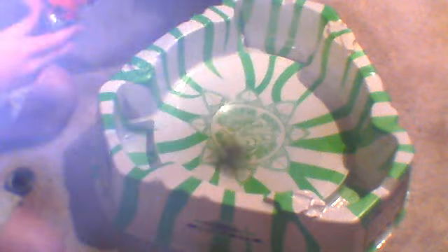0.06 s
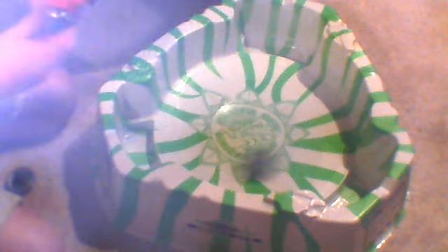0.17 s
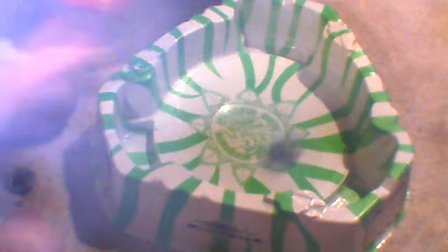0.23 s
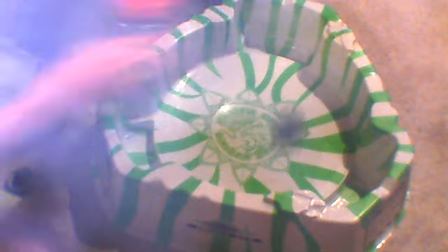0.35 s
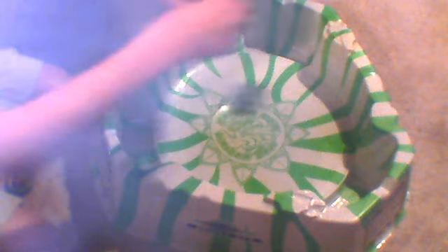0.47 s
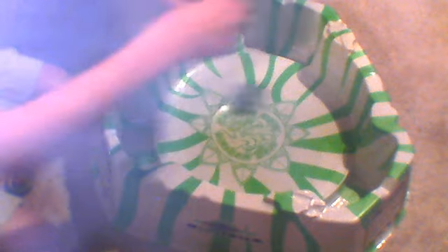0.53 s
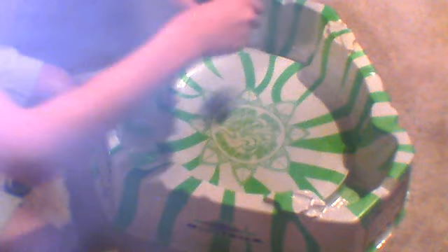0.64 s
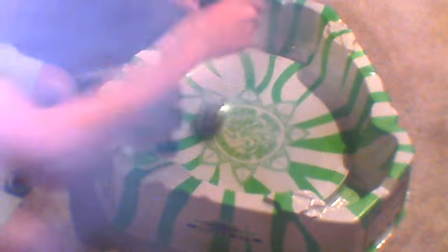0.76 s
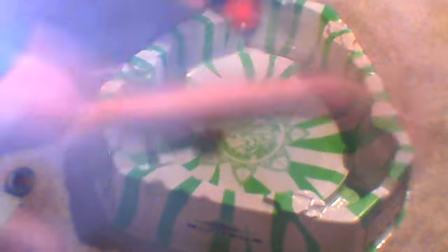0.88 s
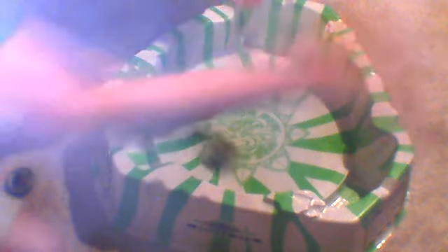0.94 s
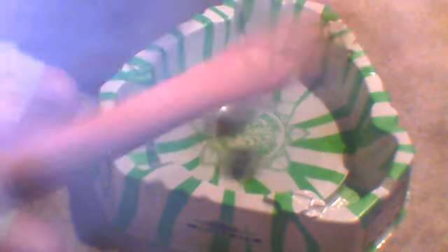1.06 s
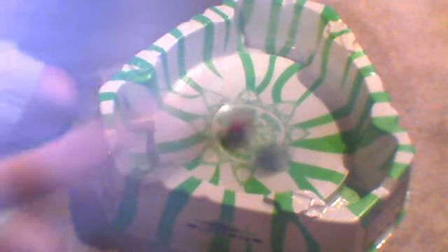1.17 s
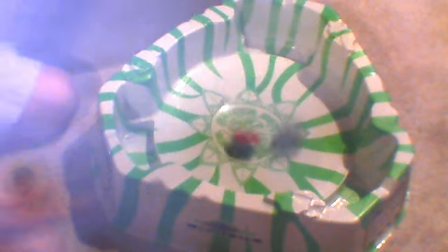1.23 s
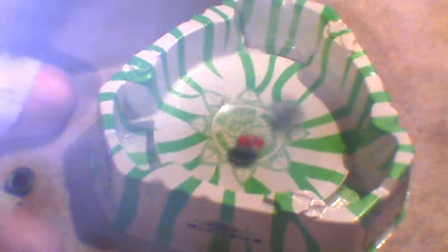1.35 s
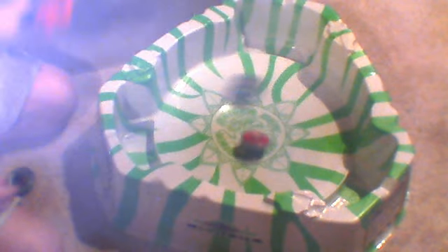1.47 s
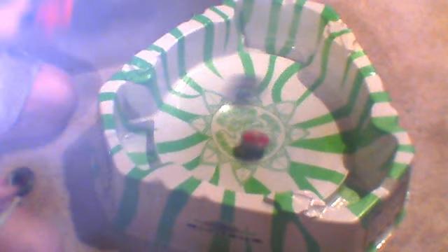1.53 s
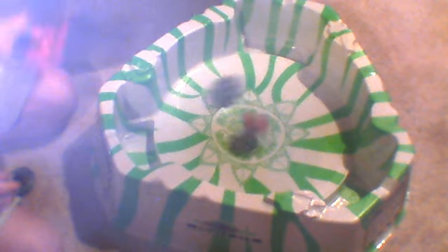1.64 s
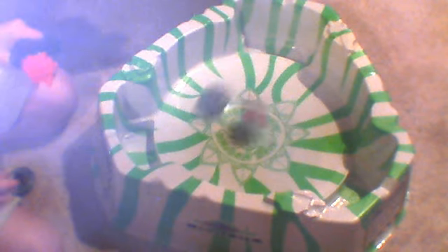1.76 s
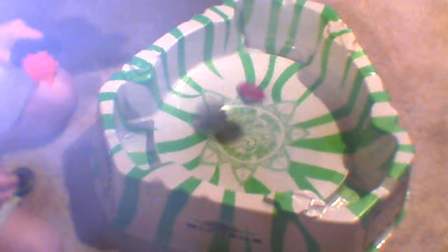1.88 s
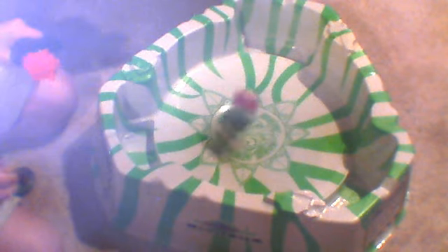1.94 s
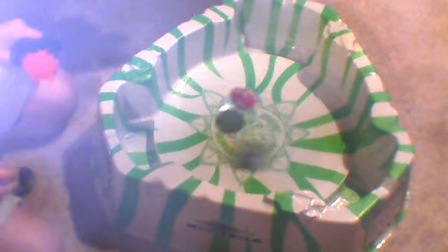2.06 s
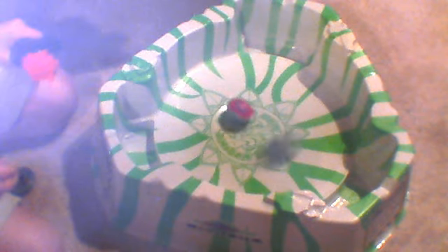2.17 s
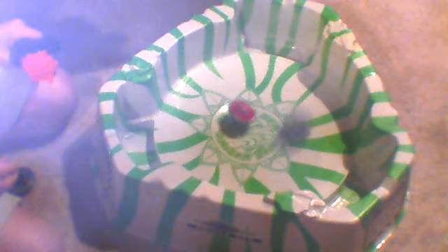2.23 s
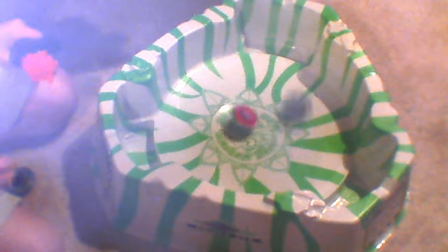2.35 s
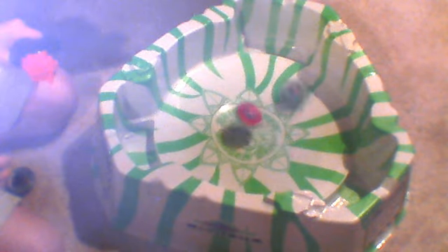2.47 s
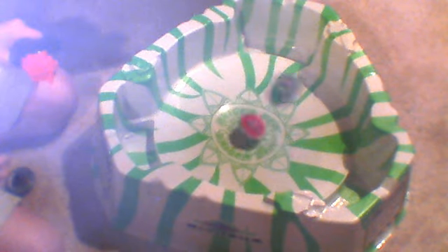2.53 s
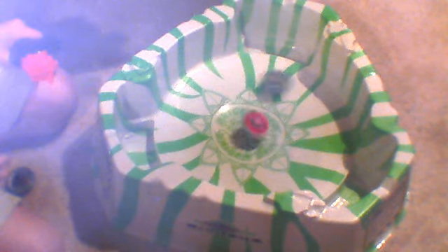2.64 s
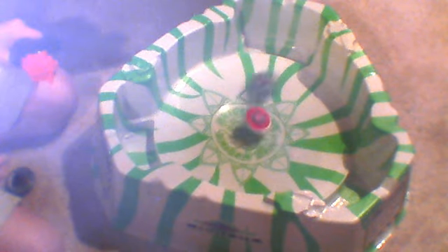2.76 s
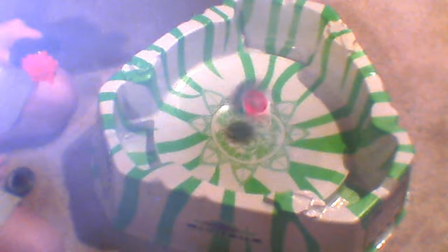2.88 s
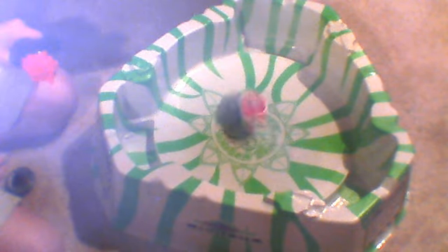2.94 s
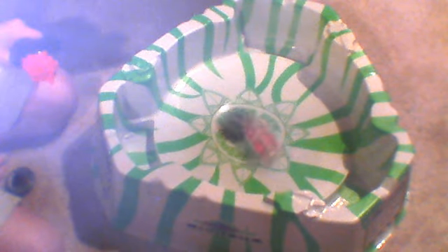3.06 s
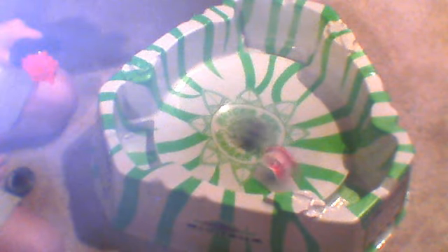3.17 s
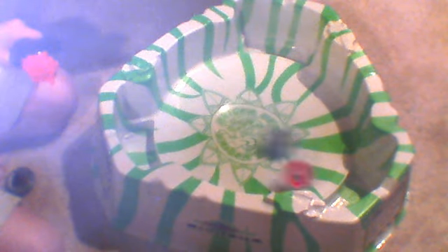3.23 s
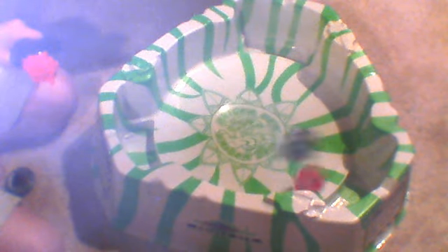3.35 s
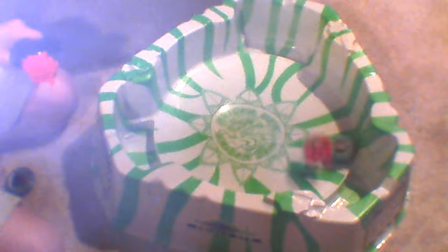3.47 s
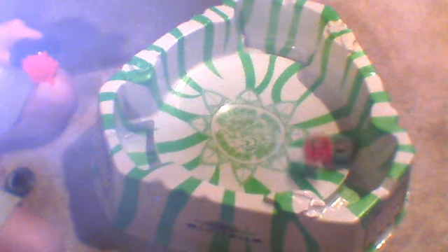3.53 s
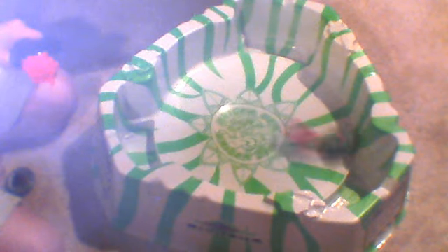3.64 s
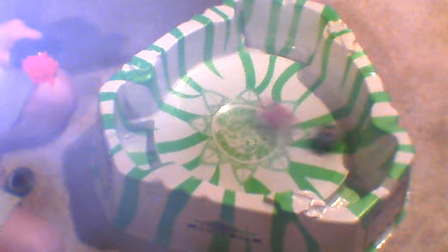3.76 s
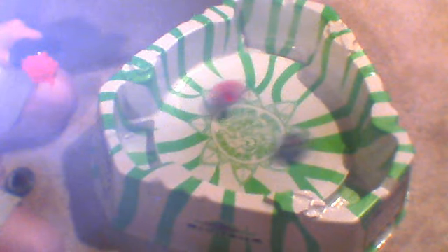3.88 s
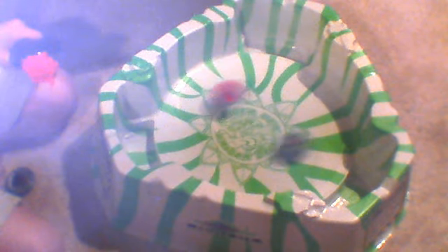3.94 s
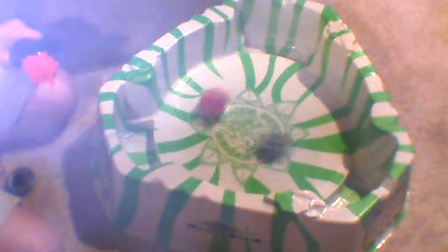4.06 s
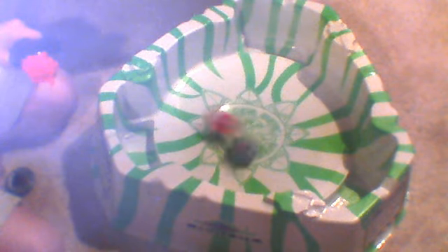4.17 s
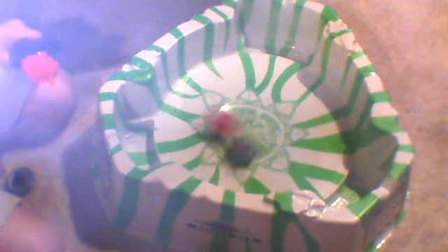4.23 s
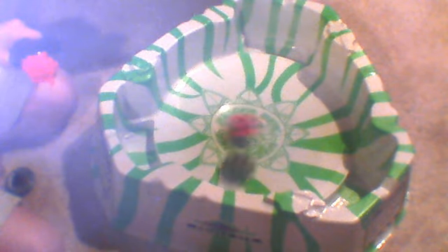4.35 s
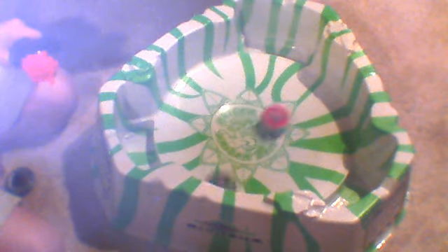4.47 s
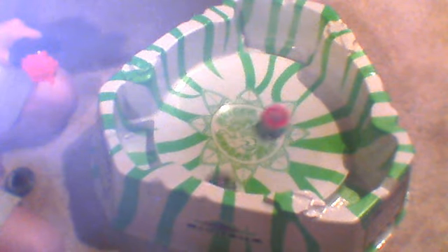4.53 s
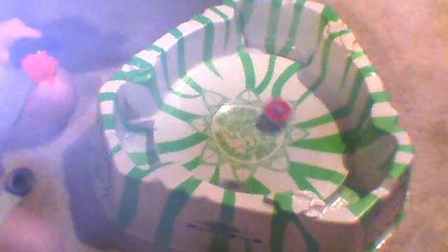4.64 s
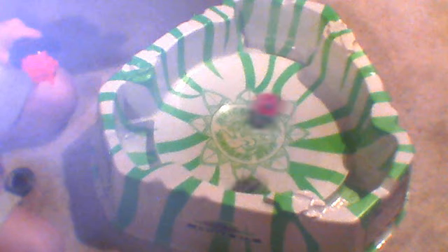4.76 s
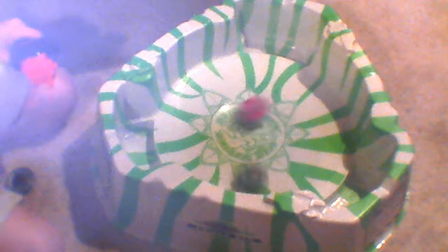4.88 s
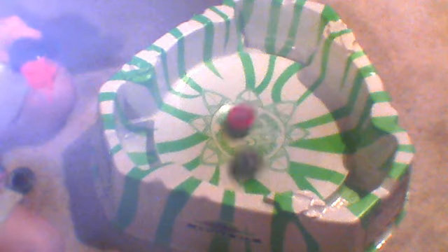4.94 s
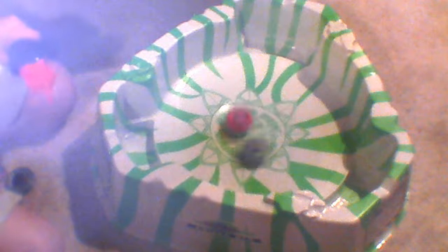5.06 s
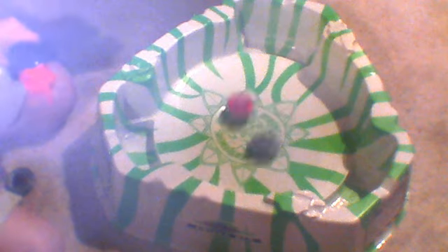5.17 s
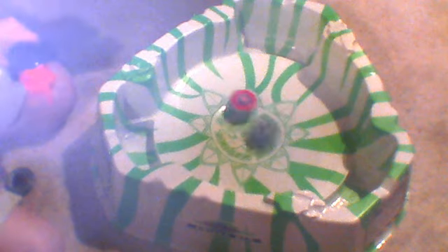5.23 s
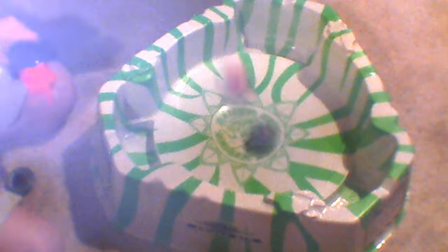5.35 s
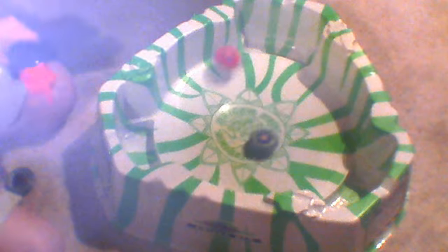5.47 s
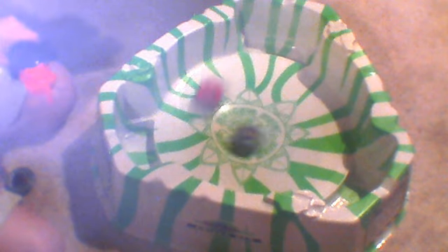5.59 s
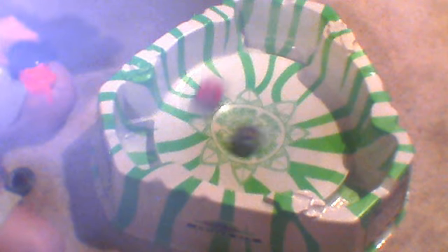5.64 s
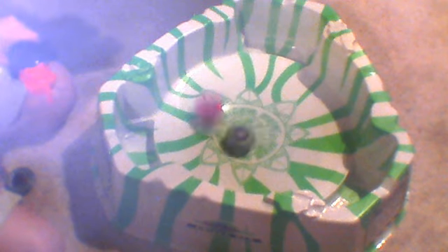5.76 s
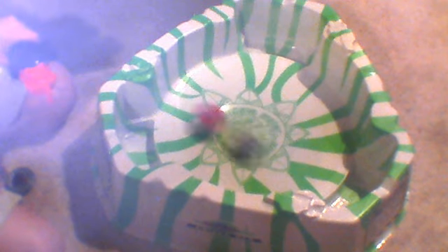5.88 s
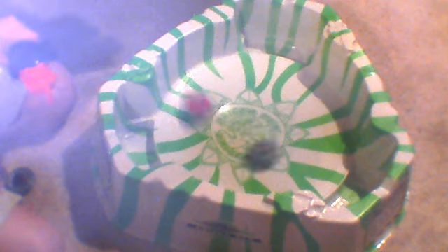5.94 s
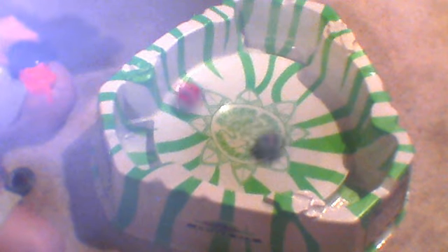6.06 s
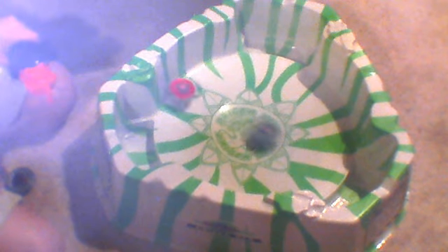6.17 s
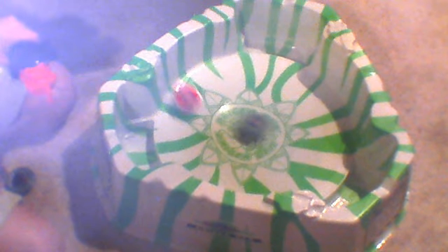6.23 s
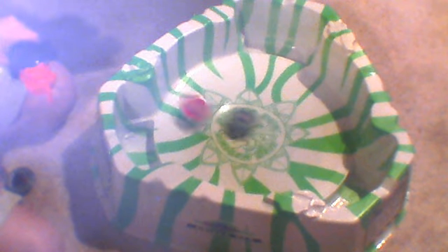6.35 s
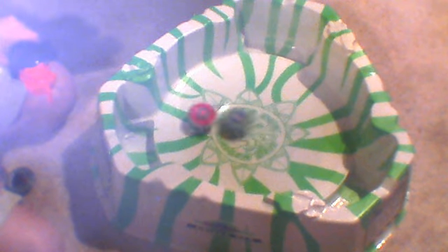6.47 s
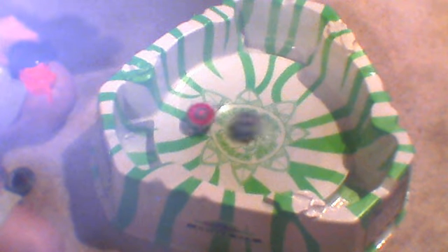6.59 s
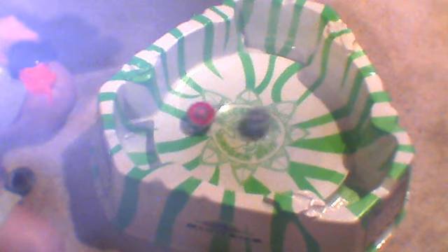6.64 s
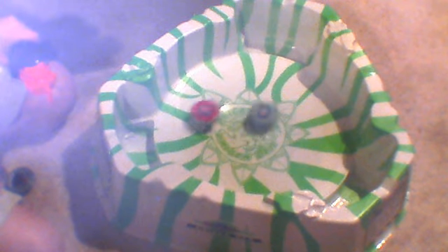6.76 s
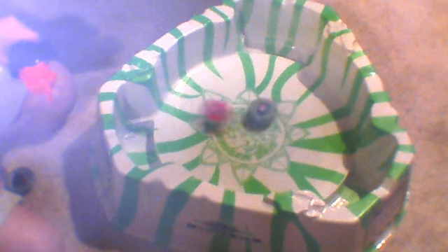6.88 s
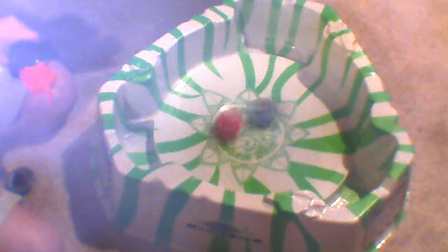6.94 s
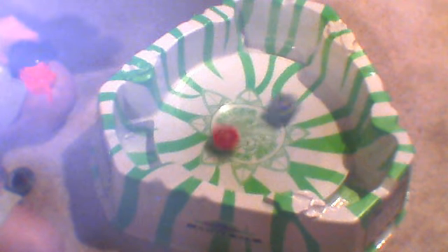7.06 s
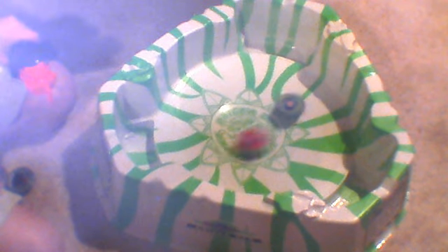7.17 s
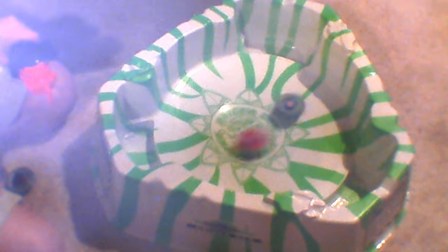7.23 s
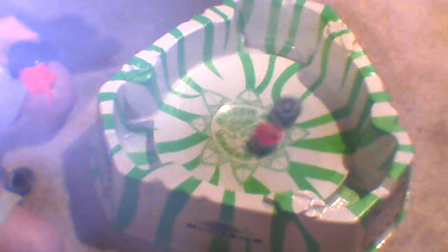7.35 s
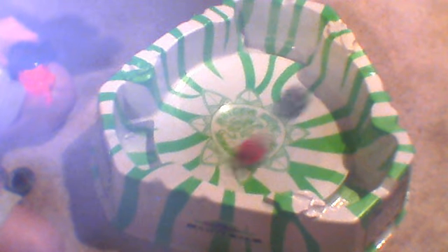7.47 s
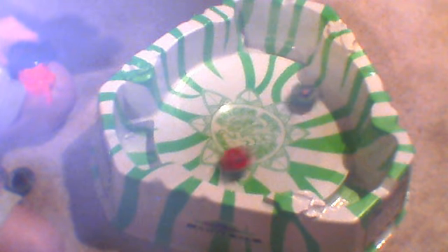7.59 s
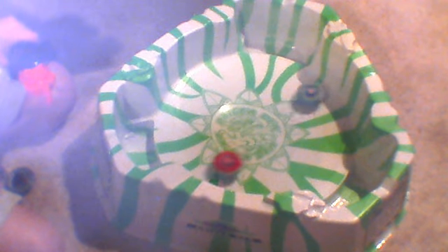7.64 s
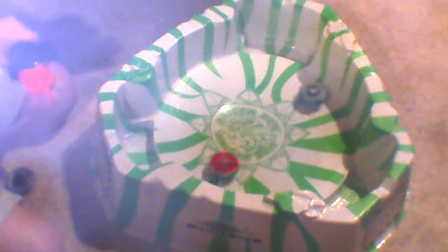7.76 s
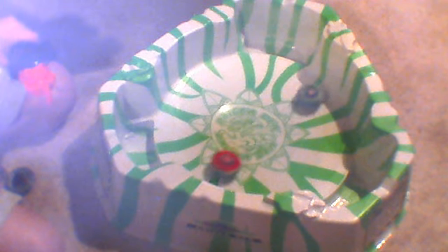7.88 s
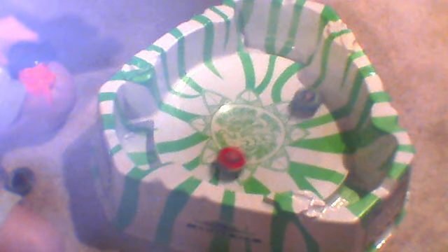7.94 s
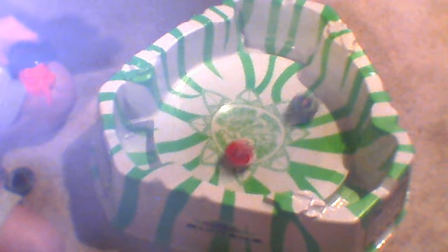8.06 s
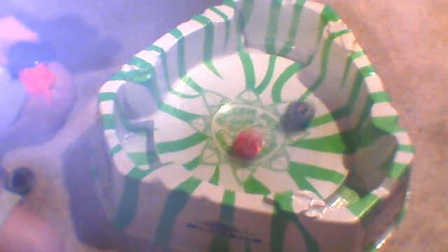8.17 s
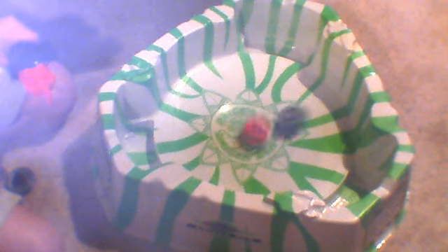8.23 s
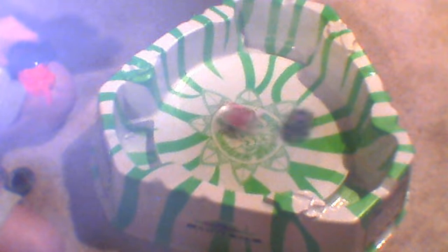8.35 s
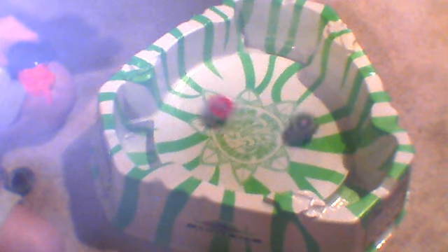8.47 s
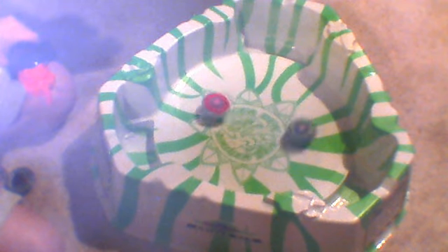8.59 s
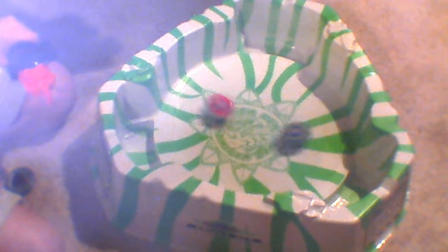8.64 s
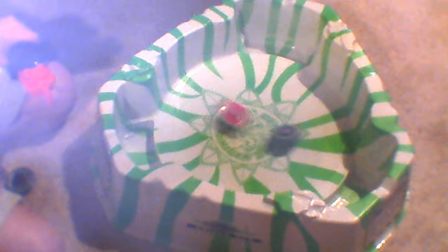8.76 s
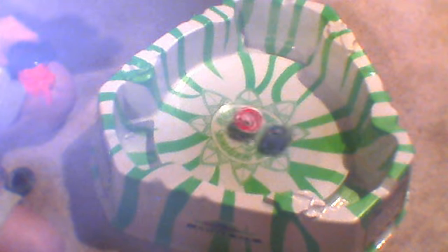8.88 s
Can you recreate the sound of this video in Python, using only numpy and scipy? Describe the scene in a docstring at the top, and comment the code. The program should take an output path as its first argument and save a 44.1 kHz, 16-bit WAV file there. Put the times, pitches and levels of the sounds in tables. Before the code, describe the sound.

A ratcheting cord rip ends in a loud crack, then metal spinning tops hop, rumble and clash in a thin plastic bowl.

```python
"""Metal spinning tops, ripped from a toothed cord into a thin plastic bowl on the floor of a small room. They
land with a crack; their tips hop and rumble over the bowl, whose decaying modes boom like a drum under knocks
and ticks. Their metal wheels clash in bright noise cracks and ring in close modes; leaning tops tap the wall.
Noise gives a steady hush, sparse echoes the room; a small mono microphone clips the loudest blows."""
import sys
import numpy as np
from scipy import signal
from scipy.fft import rfft, irfft, next_fast_len
from scipy.io import wavfile
from scipy.ndimage import uniform_filter1d

SR = 44100
rng = np.random.default_rng(int(sys.argv[2]) if len(sys.argv) > 2 else 0)


def to_wav(s):
    """Save 16-bit WAV."""
    ch = np.atleast_2d(s).T  # columns
    pcm = np.round(np.clip(ch, -1, 1) * 32767)  # PCM
    wavfile.write(sys.argv[1], SR, pcm.astype(np.int16))


def amplitude_ratio(level_db):
    """Convert a level in decibels to the matching linear amplitude (field) ratio."""
    exponent = np.asarray(level_db, float) / 20
    return 10 ** exponent


N = 392931

# modes of the bowl, its floor below 470 Hz and its walls above: f/Hz, relative level/dB, t60/s
BOWL_MODES = [(133.5, -15.5, 0.41), (199, 2.5, 0.1), (242.1, -2, 0.14), (303.4, 0, 0.11), (337, 1.5, 0.063),
              (380, -7, 0.17), (424, -6.5, 0.16), (510, -2.5, 0.055), (580, -2, 0.031), (655, -12, 0.063),
              (778, -4.5, 0.061), (854, -5.5, 0.039), (990.6, 2.5, 0.025), (1189, 8.5, 0.017),
              (1400, -1, 0.041), (1703, -1.5, 0.029), (2880, 1, 0.017), (4294, 5, 0.018)]
# spectrum of a tip ticking on plastic: f/Hz, relative density/(dB per Hz)
TICK_SPECTRUM = [(410, -24.5), (700, -14.5), (2080, -14.5), (3070, -10.5), (4220, -10.5), (5690, -15.5),
                 (10800, -47), (14000, -93)]
# spectrum of the cord and launcher: f/Hz, relative density/(dB per Hz)
CORD_SPECTRUM = [(600, -35), (950, -20.5), (1300, -3), (1800, -16), (2300, -15.5), (4500, -7), (11000, -34)]


def evened(x):
    """Normalisation to unit rms."""
    return x / np.sqrt(np.mean(x ** 2) + 1e-20)


def read(points, hz):
    """Interpolation of a curve on a logarithmic frequency axis."""
    f, value = np.transpose(points)
    return np.interp(np.log(hz + 1), np.log(f + 1), value)


def add(mix, s, sound):
    """Superposition: adds a sound to the mix from time s."""
    part = mix[round(s * SR):][:len(sound)]
    part += sound[:len(part)]


def coloured(x, spectrum):
    """Linear filtering: multiplies by a spectrum in the frequency domain, then sets rms 1."""
    size = next_fast_len(len(x))
    gain = amplitude_ratio(read(spectrum, np.fft.rfftfreq(size, 1 / SR)))
    return evened(irfft(rfft(x, size) * gain, size)[:len(x)])


def rings(modes, rise_s, size):
    """Modal decay: a damped sine and cosine for every mode, so that a blow can start each at any phase."""
    hz, db, t60 = np.transpose(modes)[:, :, None]
    t = np.arange(size) / SR
    return amplitude_ratio(db - 60 * t / t60) * np.exp(2j * np.pi * hz * t) * (1 - np.exp(-t / rise_s))


def struck(ringing, draws, spread_db, lag):
    """Modal excitation: the place of a blow sets the share and phase (lag/rad) of each mode; peak 1."""
    weights = amplitude_ratio(spread_db * draws[0]) * np.exp(1j * lag * draws[1])
    sound = (weights @ ringing).imag
    return sound / abs(sound).max()


def detuned(modes, share, draws):
    """Mass loading: the weight and spin of a top shift the modes a little at each contact."""
    return np.array(modes) * np.c_[1 + share * draws, np.ones((len(modes), 2))]


def click(spectrum, size):
    """Minimum-phase impulse: one sharp pulse with a given spectrum, starting at once, peak 1."""
    log_gain = np.log(amplitude_ratio(np.maximum(read(spectrum, abs(np.fft.fftfreq(size, 1 / SR))), -100)))
    pulse = np.fft.ifft(np.exp(np.conj(signal.hilbert(log_gain)))).real
    return pulse / abs(pulse).max()


def puff(noise, spectrum, snap_s, chatter_db, chatter_s, click_db):
    """Contact noise: a sharp snap and click, then fainter chatter as the parts rub and part."""
    t = np.arange(len(noise)) / SR
    uneven = abs(evened(uniform_filter1d(noise[::-1], size=120)))  # rubbing comes in millisecond bursts
    shape = np.exp(-t / snap_s) + amplitude_ratio(chatter_db) * uneven * np.exp(-t / chatter_s)
    shape *= 1 - np.exp(-t / 0.0016)
    late_click = np.roll(click(spectrum, len(noise)), 45)  # samples, about 1 ms
    return coloured(noise, spectrum) * shape - amplitude_ratio(click_db) * late_click


def grit(per_s, uneven_db):
    """Random point process: sparse clicks of uneven size and random sign."""
    sizes = amplitude_ratio(uneven_db * np.minimum(rng.exponential(1, N), 5))
    return sizes * (rng.random(N) < per_s / SR) * rng.choice([-1, 1], N)


def steady_hush():
    """Stationary noise: a faint hush with a fixed spectrum."""
    # f/Hz, relative density/(dB per Hz)
    hush_spectrum = [(18, -21.5), (31, 1.5), (41, 7.5), (70, -3.5), (99, -12), (145, -33.5), (311, -30.5),
                     (408, -24), (535, -18), (876, -24), (10800, -43.5), (14000, -88)]
    return amplitude_ratio(-48) * coloured(rng.standard_normal(N), hush_spectrum)


def rolling(spots=5):
    """Rolling contact: bumps excite the bowl at one of a few spots and scratch; smooth spinning hums."""
    # tips grinding over the bowl: t/s, bump drive level/dB, smooth drive level/dB
    grinding = [(0, -56, -71), (.15, -55.5, -54), (.55, -68, -54), (.94, -93, -69.5), (1.05, -30, -57),
                (1.6, -57.5, -66), (2.2, -42.5, -72), (3.2, -53, -45), (3.599, -52.5, -45), (5.1, -52, -59),
                (5.6, -55, -50), (6.3, -50.5, -49), (6.55, -51.5, -72), (7.1, -47, -61), (7.45, -47, -57),
                (7.6, -57.5, -64.5), (8.05, -54, -58), (8.3, -51.5, -65), (8.91, -57, -52.5)]
    s, bumps_db, smooth_db = np.transpose(grinding)
    t = np.arange(N) / SR
    bumps = amplitude_ratio(np.interp(t, s, bumps_db)) * evened(grit(240, 3.8))
    smooth = amplitude_ratio(np.interp(t, s, smooth_db)) * rng.standard_normal(N)
    body = BOWL_MODES[:-2]  # too soft a touch for the highest modes

    # the hum favours low modes by 7 dB an octave
    drone = amplitude_ratio(-7.0 * np.log2(np.array(body)[:, 0] / 500)) @ rings(body, 0.0005, size=9000).imag
    out = signal.oaconvolve(smooth, drone / np.linalg.norm(drone))[:N]

    spot = rng.integers(0, spots, N)
    for k, draw in enumerate(rng.standard_normal((spots, 3, len(body)))):
        rumble = struck(rings(detuned(body, 0.064, draw[2]), 0.000069, size=9000), draw, 3.0, 0.58)
        scratch = puff(rng.standard_normal(len(rumble)), TICK_SPECTRUM, 0.0009, 11.5, 0.0078, 0.74)
        response = rumble / np.linalg.norm(rumble) + amplitude_ratio(-12) * scratch / np.linalg.norm(scratch)
        out += signal.oaconvolve(bumps * (spot == k), response)[:N]
    return out


def launcher():
    """Impact noise: faint dry clicks as the launcher is loaded."""
    # t/s, level/dB
    loading_clicks = [(.059, -38.5), (.222, -38)]
    out = np.zeros(N)
    for s, db in loading_clicks:
        add(out, s, amplitude_ratio(db) * puff(rng.standard_normal(4096), CORD_SPECTRUM, 0.0045, -7.0, 0.012, 1))
    return out


def cord():
    """Repeated impact: teeth rattle through the gear, too fast to count."""
    # cord pulled through the launcher: t/s, level/dB
    pull = [(0.65, -53), (0.678, -43.5), (0.719, -27.5), (0.781, -25), (.83, -47.5), (0.861, -34.5),
            (.93, -31), (0.951, -22.5)]
    s, db = np.transpose(pull)
    level = amplitude_ratio(np.interp(np.arange(N) / SR, s, db, -120, -120))
    return level * coloured(grit(2900, 0.76), CORD_SPECTRUM)


def contacts():
    """Impact strength: each blow and hop as (t/s, knock/dB, boom/dB, spot pitch/Hz, tick/dB)."""
    # hard blows of a tip or rim on the bowl:
    # t/s, wall knock level/dB, relative floor boom level/dB, spot pitch f/Hz
    blows = [(0.945, 3, -7.5, 789), (1.07, -18.5, -13, 530), (1.133, -16, -17, 514),
             (1.191, -14.5, -16, 496), (1.263, -15, -16, 514), (1.419, -8.5, -13.5, 528),
             (1.494, -12.5, -15.5, 786), (1.633, -8.5, -10, 533), (1.848, -11.5, -9, 545),
             (2.008, -9, -12, 778), (2.104, -16.5, -15, 541), (2.193, -16, -17.5, 526),
             (2.284, -17.5, -16, 540), (2.426, -19.5, -19, 1160), (2.476, -20, -23.5, 1170),
             (2.577, -16.5, -22, 1010), (2.695, -10.5, -11, 660), (2.929, -11, -11.5, 1140),
             (3.007, -9.5, -18.5, 830), (3.098, -22.5, -27, 848), (3.241, -8, -19, 770),
             (3.375, -7, -16.5, 810), (3.479, -10.5, -28, 1100), (3.526, -10, -21.5, 785),
             (3.902, -16, -23.5, 773), (4.133, -18.5, -19.5, 660), (5.331, -8, -24.5, 540),
             (5.416, -20.5, -25.5, 830), (5.3295, -7, -30, 1400), (8.206, -19.5, -48, 1530)]
    # light hops of a tip over the bowl: t/s, knock level/dB
    hops = [(3.61, -21), (3.66, -24.5), (3.702, -28.5), (3.743, -35), (3.789, -27), (3.799, -26),
            (3.977, -24.5), (4.043, -29), (4.226, -21), (4.286, -28), (4.318, -31.5), (4.347, -27.5),
            (4.363, -26.5), (4.426, -24.5), (4.478, -25.5), (4.497, -24.5), (4.546, -24.5), (4.605, -25.5),
            (4.669, -24.5), (4.709, -36), (4.743, -27.5), (4.798, -31.5), (4.829, -34), (4.844, -32.5),
            (4.893, -27.5), (4.937, -28.5), (4.99, -30), (5.026, -32), (5.045, -32), (5.078, -29),
            (5.09, -30), (5.151, -24), (5.303, -25.5), (5.474, -32.5), (5.523, -31.5), (5.596, -34.5),
            (5.667, -27.5), (5.693, -21.5), (5.808, -23.5), (5.857, -32.5), (5.927, -32.5), (5.965, -31),
            (5.994, -33.5), (6.016, -44), (6.052, -34), (6.092, -34.5), (6.122, -38), (6.159, -37),
            (6.2, -29), (6.251, -30), (6.27, -32), (6.322, -29), (6.726, -33), (6.773, -31), (6.809, -25),
            (6.993, -31.5), (7.038, -28.5), (7.083, -29), (7.121, -31.5), (7.266, -34.5), (7.322, -30),
            (7.424, -36), (7.981, -36), (8.033, -36)]
    luck = rng.standard_normal((len(hops), 2))
    s, db = np.transpose(hops)
    hop_boom_db = db - 3.5 + 2 * luck[:, 0]
    hop_hz = 750 * 2 ** (luck[:, 1] / 2)
    rows = np.r_[blows, np.c_[s, db, hop_boom_db, hop_hz]]
    tick_db = -11.5 + 0.48 * rows[:, 1] + 0.34 * rows[:, 2]  # the tick grows slower than the blow
    return np.c_[rows, tick_db]


def strikes():
    """Modal impact: every contact gives a boom, a knock and a gritty tick, then two weaker rebounds."""
    low = np.array(BOWL_MODES)[:, 0] < 470  # Hz: floor below, walls above
    out = np.zeros(N)
    for s, knock_db, boom_db, spot_hz, tick_db in contacts():
        draw = rng.standard_normal((3, len(BOWL_MODES)))
        modes = detuned(BOWL_MODES, 0.054, draw[2])
        # wall modes lose 6.5 dB an octave away from the pitch of the spot
        modes[:, 1] -= 6.5 * abs(np.log2(modes[:, 0] / spot_hz)) * ~low
        knock = amplitude_ratio(knock_db) * struck(rings(modes[~low], 0.0025, size=4096), draw[:, ~low], 3.35, 0.56)
        knock += amplitude_ratio(tick_db) * puff(rng.standard_normal(4096), TICK_SPECTRUM, 0.0028, -6, 0.016, 8)
        add(out, s, knock)
        for late, weak in rng.random((2, 2)):
            add(out, s + 0.003 + 0.022 * late, amplitude_ratio(-9.0 - 17.0 * weak) * knock)
        boom = struck(rings(modes[low], 0.0013, size=9000), draw[:, low], 2.18, 0.66)
        add(out, s, amplitude_ratio(boom_db + 4.5) * boom)
    return out


def clashes():
    """Metal impact: a bright crack, close wheel modes that flutter irregularly, and a jolt to the bowl."""
    # the tops landing in the bowl (first row), then metal wheel on metal wheel: t/s, relative crack level/dB,
    # relative ring level/dB
    meetings = [(0.95, 9, -43), (0.9719, 1.5, -37), (2.831, -1, -20), (2.911, -13, -51), (2.9294, -7, -37),
                (3.446, -25, -56), (3.5147, -7, -25), (4.18, -10.5, -50), (4.9504, -6, -50),
                (5.2053, 4, -17), (5.7234, -7.5, -19), (5.7315, -5.5, -45), (6.3427, -9, -27),
                (6.8486, -3, -11.5), (7.2865, -1.5, -12.5), (8.2035, -1.5, -13), (8.7704, -11, -44),
                (8.7933, -9.5, -43)]
    # modes of a metal wheel: f/Hz, relative level/dB, t60/s
    wheel_modes = [(4780, 14, .035), (4990, 5, .17), (5100, 7, .2), (5190, 6, .14), (5430, 5, .09),
                   (5280, 16, .03)]
    # spectrum of the crack: f/Hz, relative density/(dB per Hz)
    crack_spectrum = [(600, -57.5), (950, -22), (1400, -15.5), (2250, -23), (3300, -11.5), (5100, -4.5),
                      (6500, -15), (11000, -28.5)]
    out = np.zeros(N)
    for s, crack_db, ring_db in meetings:
        draw = rng.standard_normal((3, len(BOWL_MODES)))
        noise, shake = rng.standard_normal((2, 8192))
        wheel_draw = draw[:, :len(wheel_modes)]
        wheel = rings(detuned(wheel_modes, 0.009, wheel_draw[2]), 0.0013, size=8192)
        bowl = rings(detuned(BOWL_MODES, 0.046, draw[2]), 0.00037, size=9000)
        slow_noise = uniform_filter1d(uniform_filter1d(shake, size=110), size=110)
        flutter = 1 + 0.65 * evened(slow_noise)
        add(out, s, amplitude_ratio(crack_db - 6.5) * puff(noise, crack_spectrum, 0.0032, -19, 0.028, 0.83))
        add(out, s, amplitude_ratio(ring_db) * flutter * struck(wheel, wheel_draw, 0.67, 0.39))
        add(out, s, amplitude_ratio(crack_db - 22.5) * struck(bowl, draw, 2.7, 1.0))
    return out


def wobble():
    """Precession: a tiring top leans and taps the wall once a turn of its wobble, on average ever harder."""
    # first tap t/s, turn period/s, number of turns, starting level/dB
    leaning = [(7.491, .0546, 13, -39), (8.398, 0.06, 9, -52)]
    upper = rings(BOWL_MODES[-5:-2], 0.00017, size=4096)
    out = np.zeros(N)
    for first_s, turn_s, count, tap_db in leaning:
        for turn, draw in enumerate(rng.standard_normal((round(count), 2, len(upper)))):
            tap = struck(upper, draw, 1.4, 0.88)
            tap += amplitude_ratio(-19) * puff(rng.standard_normal(4096), TICK_SPECTRUM, 0.0029, -12, 0.018, 1)
            level_db = tap_db + turn / 2 + 1.7 * draw[1, 0]
            add(out, first_s + turn * turn_s, amplitude_ratio(level_db) * tap)
    return out


def room(x):
    """Reverberation: sparse echoes of random sign, with a decay time that depends on frequency."""
    # f/Hz, t60/s
    decay_times = [(150, 0.34), (2000, 0.25), (10000, 0.11)]
    taps = np.zeros((3, SR // 2))
    spacing = np.arange(200, SR // 2 - 20, 20)
    at = spacing + rng.integers(0, 20, (3, len(spacing)))
    np.put_along_axis(taps, at, rng.choice([-1., 1.], at.shape), 1)
    hz, t, z = signal.stft(taps, SR, nperseg=256)
    decay = amplitude_ratio(-60 * t / read(decay_times, hz)[:, None])
    tails = signal.istft(z * decay, SR, nperseg=256)[1]
    # the echo pattern changes as the tops move: three tails weighted in rotation, 1.7 turns a second
    turns = 1.7 * np.arange(N) / SR + np.arange(3)[:, None] / 3
    place = np.cos(2 * np.pi * turns) * np.sqrt(2 / 3)
    return signal.oaconvolve(x * place, tails / np.linalg.norm(tails[0]), axes=1).sum(0)[:N]


def scene():
    """Superposition of the direct sources, their echoes and the hush, alike in both channels."""
    near = rolling() + launcher() + cord() + strikes() + clashes() + wobble()
    return np.tile(near + amplitude_ratio(-10.0) * room(near) + steady_hush(), (2, 1))


def band_limit(x):
    """A steep low-pass at the top of the band."""
    return signal.sosfilt(signal.butter(12, 16450, fs=SR, output="sos"), x)


def record(dry):
    """Clipping and sampling at half rate; the upsampler lets a faint mirror of the band edge through."""
    band = signal.firwin(255, 10734, window=("kaiser", 8), fs=SR)[None]
    mirror = signal.firwin(101, [11200, 11900], pass_zero=False, window=("kaiser", 8), fs=SR)[None]
    limited = signal.oaconvolve(np.clip(dry, -0.7, 0.7), band, "same")
    sampled = 2 * limited * (np.arange(N) % 2 == 0)  # every other sample is zero
    smooth = signal.oaconvolve(sampled, band, "same")
    smooth += amplitude_ratio(-13.5) * signal.oaconvolve(sampled, mirror, "same")
    mix = np.clip(smooth, -0.72, 0.72)
    return band_limit(mix)


dry = scene()
out = record(dry)
to_wav(out)
```